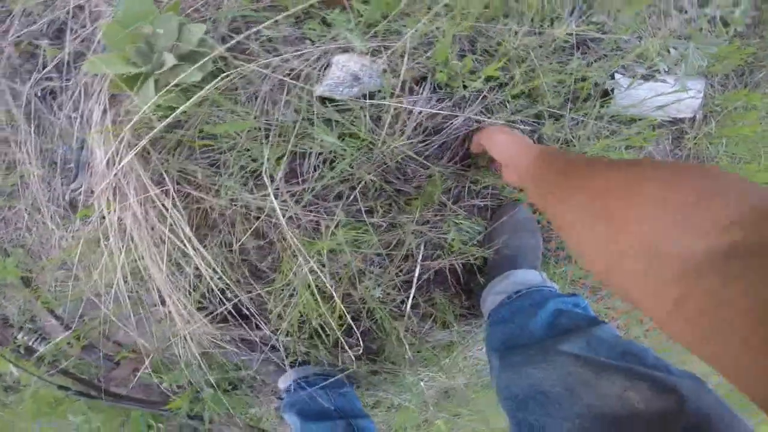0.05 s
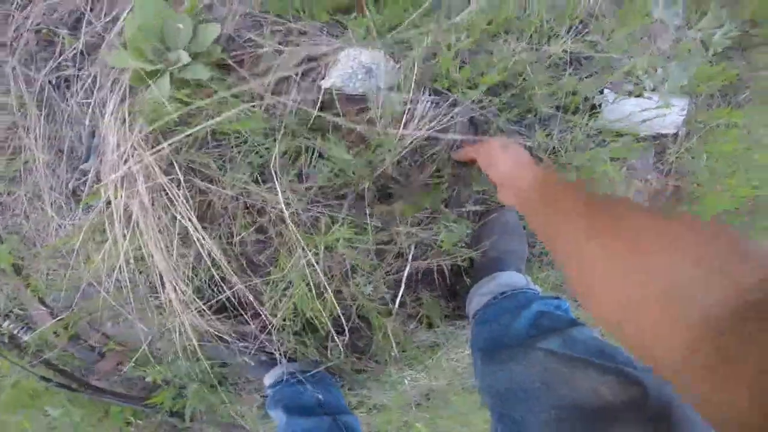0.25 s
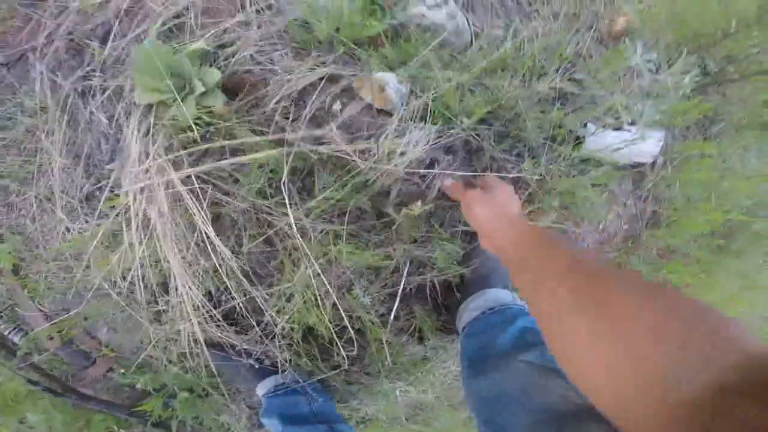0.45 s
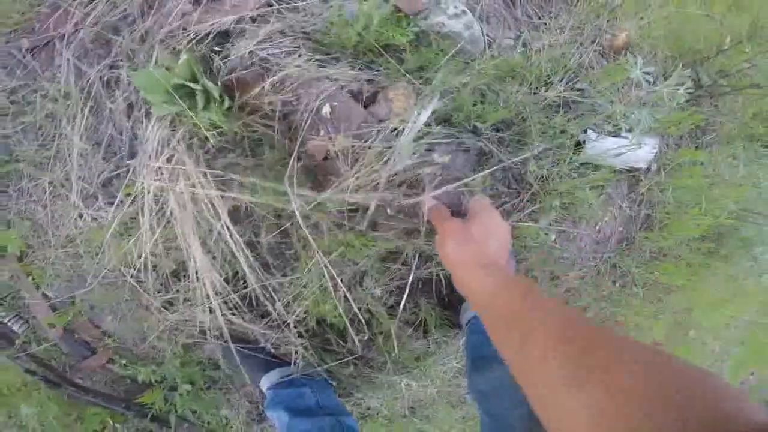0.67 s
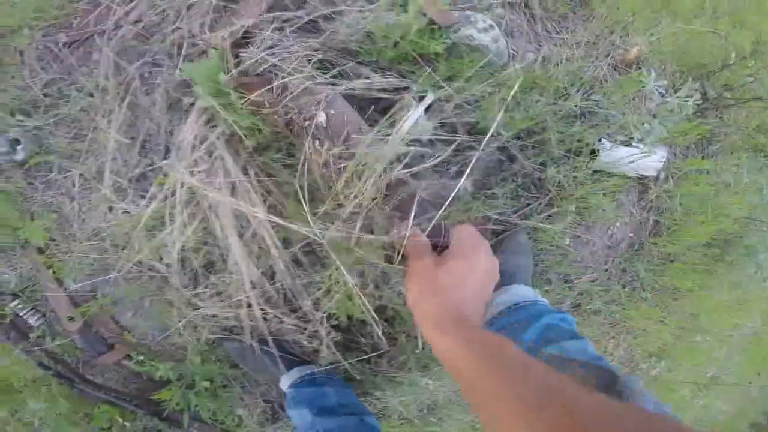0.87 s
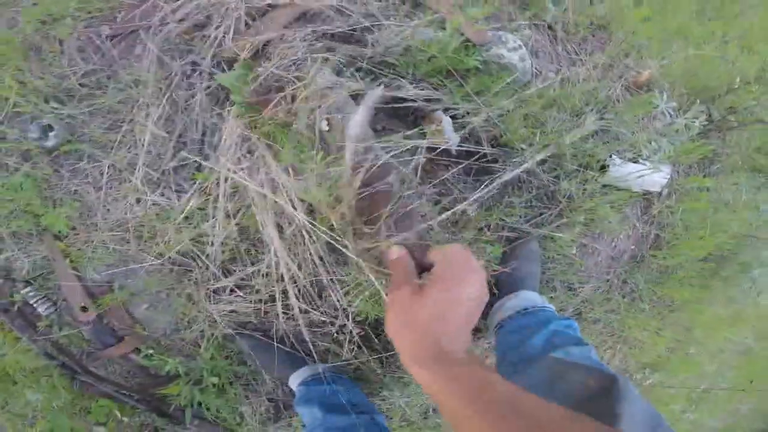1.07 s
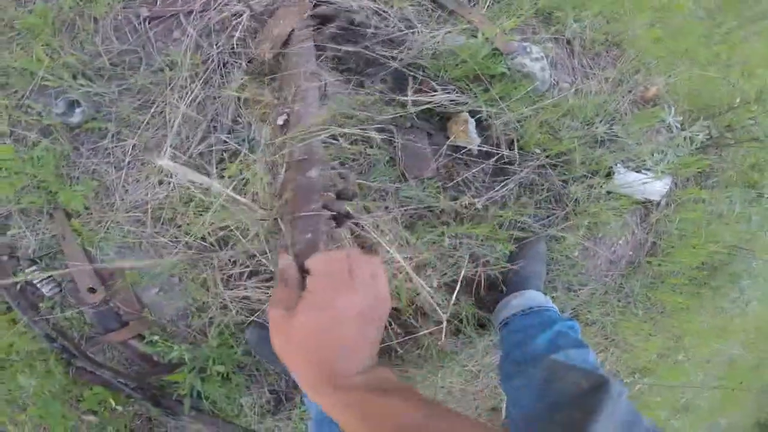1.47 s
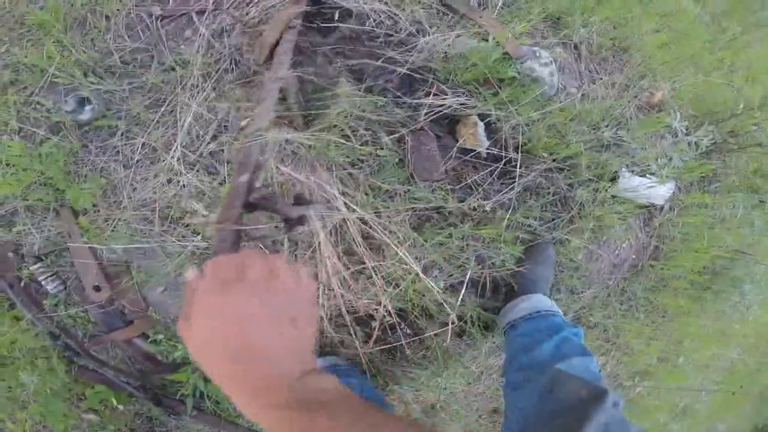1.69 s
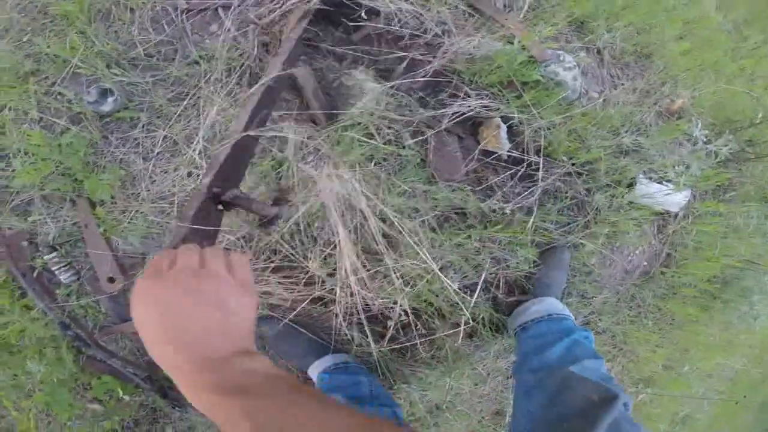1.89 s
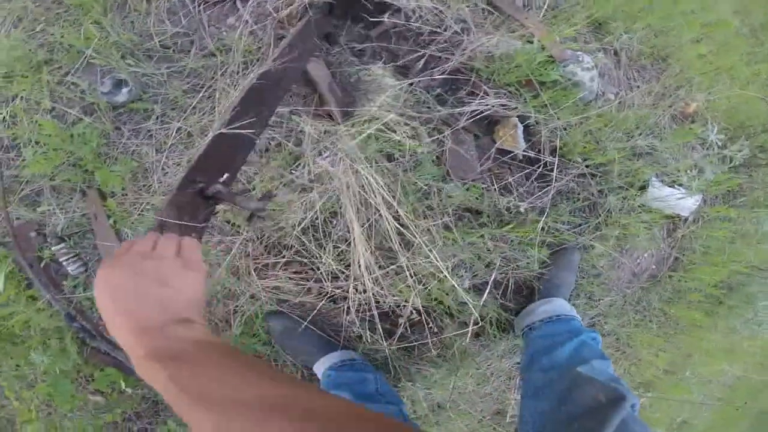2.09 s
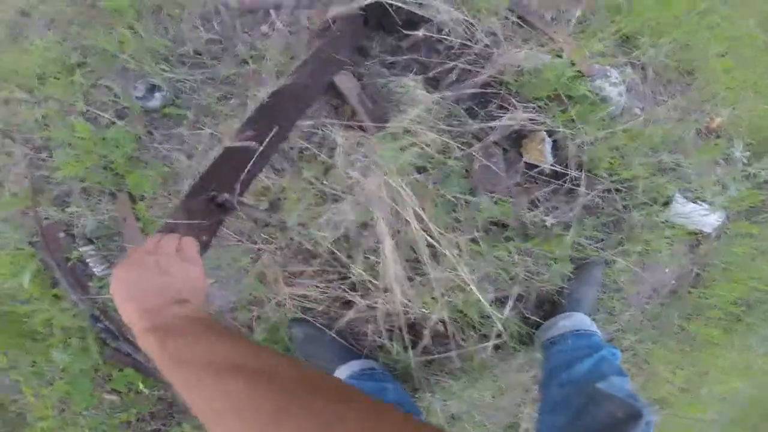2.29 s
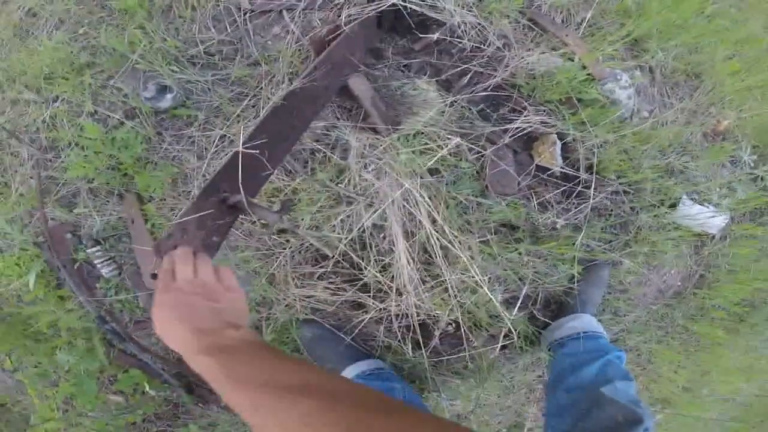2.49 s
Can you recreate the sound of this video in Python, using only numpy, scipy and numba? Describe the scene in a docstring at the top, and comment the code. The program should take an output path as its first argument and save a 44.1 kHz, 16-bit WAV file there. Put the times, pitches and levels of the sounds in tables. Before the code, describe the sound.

Steel bar dragged over soil and stones as dry stalks rustle and snap.

```python
"""A rusty steel bar is pulled out of dry grass and dragged over the ground, close by, outdoors.
Stalks rustle and snap as it starts to move, then it grinds through soil, knocks on stones and clinks.
Just after one second its edge judders and rasps over a stone. The grinding dies away, leaving
thinner rustle and snaps, until a last short scrape and two knocks at about 2.3 s.
Nearly all of the sound is in the right channel, over faint air and rumble."""
import sys
import numpy as np
from scipy import signal
from scipy.fft import rfft, irfft, next_fast_len
from scipy.io import wavfile
from numba import njit

SR = 44100
rng = np.random.default_rng(int(sys.argv[2]) if len(sys.argv) > 2 else 0)


def file_out(sig):
    """Save sig as 16-bit WAV at sys.argv[1]."""
    # one column per channel
    cols = np.atleast_2d(sig).T
    # limit, then scale
    lim = np.clip(cols, -1, 1)
    pcm = np.round(lim * 32767).astype(np.int16)
    wavfile.write(sys.argv[1], SR, pcm)


N = 116865
TIME = np.arange(N) / SR
CRUSH_S, CRACK_DB = 0.001, 8   # attack of a contact; its opening spike above the noise tail


def from_db(db):
    """Decibels to gain."""
    return 10 ** (np.asarray(db) / 20)


def rms_one(x):
    """Scale to an rms of one."""
    return x / np.sqrt(np.mean(x ** 2) + 1e-20)


def envelope(curve):
    """Gain over time from rows of time_s, level_db."""
    return from_db(np.interp(TIME, *np.transpose(curve)))


def add(out, start_s, sound):
    """Mix a short sound in at a time."""
    start = int(np.clip(start_s * SR, 0, N - 1))
    out[start:start + len(sound)] += sound[:N - start]


def drift(per_s, size=N):
    """Random modulation that glides to a new value so many times a second."""
    return np.interp(TIME[:size] * per_s, np.arange(1000), rng.standard_normal(1000))


def grains(per_s, spread_db):
    """Random clicks; the further spread_db is from zero, the more their sizes vary."""
    sizes = from_db(spread_db * np.minimum(rng.exponential(1, N), 4.5)) * rng.choice([-1, 1], N)
    return sizes * (rng.random(N) < per_s / SR)


def colour(x, spectrum):
    """Minimum-phase EQ from rows of frequency_hz, gain_db; the result has an rms of one."""
    size = 2 * next_fast_len(N)
    hz, db = np.transpose(spectrum)
    bin_hz = np.arange(size // 2 + 1) * SR / size
    log_gain = np.log(from_db(np.interp(np.log(bin_hz + 1), np.log(hz), db)))
    cepstrum = irfft(log_gain)
    response = np.exp(2 * rfft(cepstrum[:size // 2], size))
    return rms_one(irfft(rfft(x, size) * response)[:N])


def resonance(x, hz, width_hz):
    """Resonant band-pass with unity gain at its peak."""
    radius = np.exp(-np.pi * width_hz / SR)
    feedback = [1, -2 * radius * np.cos(2 * np.pi * hz / SR), radius ** 2]
    return signal.lfilter(np.array([1, 0, -1]) * (1 - radius ** 2) / 2, feedback, x)


@njit
def gliding_resonance(x, hz, width_hz):
    """Resonant band-pass with a moving centre."""
    radius = np.exp(-np.pi * width_hz / SR)
    feedback = 2 * radius * np.cos(2 * np.pi * hz / SR)
    y = np.zeros(len(x))
    for i in range(2, len(x)):
        y[i] = x[i] - x[i - 2] + feedback[i] * y[i - 1] - radius ** 2 * y[i - 2]
    return y


# how hard the bar grinds on the soil: time_s, level_db
GRIND_ENVELOPE = [(0.1, -65.5), (0.18, -38), (0.23, -38.5), (0.26, -29), (0.42, -21), (0.478, -37.5),
                  (0.51, -28.5), (0.62, -29), (0.69, -35.5), (0.77, -29), (0.82, -33.5), (0.98, -36),
                  (1.05, -46.5), (1.14, -34), (1.29, -35.5), (1.36, -53.5), (1.65, -66), (2.22, -61.5),
                  (2.29, -43), (2.41, -54.5), (2.55, -68)]
# tone of the crushed grit: frequency_hz, gain_db
GRIT_EQ = [(150, -20), (260, -7.5), (400, -2), (560, 2), (850, 0.5), (1150, -2), (1600, -7.5),
           (2500, -11.5), (6000, -37.5)]
# glide of the hollow scrape: time_s, pitch_hz
HOLLOW_GLIDE = [(.25, 710), (.33, 630), (.40, 517), (.445, 360), (.51, 667), (.63, 688), (.77, 482),
                (1.0, 564), (1.1, 308), (1.3, 290), (1.5, 830)]
SOIL_GRAINS_PER_S, SOIL_SPREAD_DB, JUDDER_DB = 2900, 3.5, 4
GRIT_DB, HOLLOW_DB = 0.5, -4


def soil():
    """Grit is crushed under the juddering bar, with a hollow resonance that glides as the bar moves."""
    judder = from_db(JUDDER_DB * drift(per_s=90))
    grit = colour(judder * grains(SOIL_GRAINS_PER_S, SOIL_SPREAD_DB), GRIT_EQ)
    hollow = judder * grains(SOIL_GRAINS_PER_S, SOIL_SPREAD_DB)
    pitch_hz = np.interp(TIME, *np.transpose(HOLLOW_GLIDE))
    for _ in range(2):   # two passes for steeper slopes
        hollow = gliding_resonance(hollow, pitch_hz, width_hz=140)
    return envelope(GRIND_ENVELOPE) * (from_db(GRIT_DB) * grit + from_db(HOLLOW_DB) * rms_one(hollow))


# hits of stones and thick stems on the bar: start_s, thud_db, knock_db, crack_db, tick_db
KNOCK_HITS = [(0.2601, -29.5, -31, -27, -40), (0.3157, -37, -23, -27.5, -35),
              (0.4454, -17, -22, -31, -47.0), (0.4982, -34, -26, -24.5, -41),
              (0.5292, -28, -21.5, -39, -45.0), (0.558, -23.5, -19, -25, -53),
              (0.7133, -26.5, -25, -40, -41), (0.7363, -23, -25.5, -26, -19.5),
              (0.7416, -26.5, -22.5, -27, -29), (0.8479, -31.5, -33, -26.5, -32),
              (0.8845, -32.5, -25.5, -34, -53), (0.9546, -41, -24, -25.5, -55),
              (1.0623, -43, -25, -19, -31.5), (1.274, -34, -25.5, -25, -34.5), (1.2983, -30, -28, -37, -62),
              (1.4022, -41.5, -31, -34, -58), (1.4521, -39.5, -30.5, -29, -54),
              (1.4844, -67, -34, -27.5, -41), (1.5136, -68, -60, -36, -34.5),
              (1.5769, -44.5, -32.5, -35.5, -38), (1.7576, -55, -34, -26.5, -33.5),
              (2.3247, -45, -28, -27.5, -27), (2.3639, -41.5, -29.5, -30, -38)]
# the thud, knock, crack and tick bands: low_hz, high_hz
KNOCK_BANDS_HZ = [(230, 900), (900, 2500), (2500, 7000), (7000, 15000)]
# trim of each band: gain_db
BAND_TRIMS_DB = [0, 0, 0, -1]
# decay of each band: t60_s
BAND_DECAYS_S = [0.015, 0.039, 0.03, 0.022]


def knocks():
    """Each contact crushes briefly, cracks and dies in a grainy burst whose mids last longest."""
    out, t = np.zeros(N), TIME[:SR // 12]
    bands = [signal.butter(3, edges, "band", fs=SR, output="sos") for edges in KNOCK_BANDS_HZ]
    energy = 0.0079 * SR   # as much as 7.9 ms at an rms of one
    for start_s, *band_db in KNOCK_HITS:
        roughness = from_db(1.5 * drift(per_s=694, size=len(t)))
        burst = rng.standard_normal(len(t)) * roughness * np.minimum(t / CRUSH_S, 1)
        burst[int(CRUSH_S * SR)] = from_db(CRACK_DB)
        for band, level_db, trim_db, t60_s in zip(bands, band_db, BAND_TRIMS_DB, BAND_DECAYS_S):
            part = signal.sosfilt(band, burst * from_db(-60 * t / t60_s))
            part *= np.sqrt(energy / np.sum(part ** 2))
            add(out, start_s, from_db(level_db + trim_db) * part)
    return out


# modes of the freely ringing bar: pitch_hz
MODE_PITCHES_HZ = [826, 1100, 1570, 2326, 2665, 3540, 3966, 4829, 5604, 6068, 6523, 7452, 9900, 11400]
# ring of each mode: level_db, t60_s
MODE_RINGS = [(0, 0.054), (4.5, 0.027), (-1, 0.019), (-7, 0.21), (-13.5, 0.12), (-10, 0.094), (-9, 0.12),
              (-16, 0.25), (-3.5, 0.085), (-16, 0.21), (-14.5, 0.22), (-14, 0.38), (5, 0.029), (5, 0.04)]
# hard contacts on the steel: start_s, level_db, favoured_hz, rolloff_hz
CLINK_HITS = [(0.5294, -27.5, 1570, 1900), (0.5612, -27.5, 1570, 1900), (.849, -30.5, 6100, 14000),
              (0.885, -19, 3700, 5600), (0.956, -35.5, 2700, 7760), (1.108, -38.5, 7450, 8900),
              (1.145, -38, 7450, 8600), (1.199, -38, 3600, 7900), (1.7579, -44, 2750, 4500)]
FAVOUR_DB, FAVOUR_OCTAVES = 19, 0.13


def clinks():
    """The bar rings: the place of contact favours modes near one pitch, its hardness sets the top end."""
    out, t = np.zeros(N), TIME[:SR // 3]
    for start_s, level_db, favoured_hz, rolloff_hz in CLINK_HITS:
        for hz, (mode_db, t60_s) in zip(MODE_PITCHES_HZ, MODE_RINGS):
            favour = np.exp(-(np.log2(hz / favoured_hz) / FAVOUR_OCTAVES) ** 2)
            rolloff = 1 / np.sqrt(1 + (hz / rolloff_hz) ** 10)
            ring = np.sin(2 * np.pi * hz * t) * from_db(-60 * t / t60_s) * rng.choice([-1, 1])
            add(out, start_s, rolloff * from_db(level_db + mode_db + FAVOUR_DB * favour) * ring)
    return out


# strokes of the edge over a stone: start_s, length_s, grit_db, ring_db, pitch_hz
RASP_STROKES = [(1.114, 0.12, -32.5, -43, 7500), (2.247, 0.078, -32, -32.5, 1080)]
# band of the rasp's grit: low_hz, high_hz
RASP_BAND_HZ = [920, 5900]


def rasps():
    """Quick tiny slips of the edge make a broken, gritty scrape and set one resonance singing."""
    out = np.zeros(N)
    band = signal.butter(3, RASP_BAND_HZ, "band", fs=SR, output="sos")
    for start_s, length_s, grit_db, ring_db, pitch_hz in RASP_STROKES:
        progress = np.clip((TIME - start_s) / length_s, 0, 1)
        swell = np.sqrt(np.maximum(np.sin(np.pi * progress), 0))
        catches = grains(per_s=1200, spread_db=-0.5) * from_db(JUDDER_DB * drift(per_s=90))
        grit = bar_body(signal.sosfilt(band, catches))
        ring = resonance(catches, pitch_hz, width_hz=130)
        out += swell * (from_db(grit_db) * rms_one(grit) + from_db(ring_db) * rms_one(ring))
    return out


# a quick stick-slip judder of the edge: start_s, level_db
SLIP_CLICKS = [(1.1051, -10), (1.1097, -7), (1.1165, -10.5), (1.1315, -9.5), (1.1462, -6), (1.161, -8.5),
               (1.1795, -12), (1.1995, -14), (1.2111, -9)]
# band of the clicks: low_hz, high_hz
CLICK_BAND_HZ = [1500, 7500]
SLIP_T60_S, SLIP_TAIL_DB = 0.011, -3.5


def slips():
    """Each slip of the edge is a hard click with a very short gritty tail."""
    out, t = np.zeros(N), TIME[:SR // 20]
    for start_s, level_db in SLIP_CLICKS:
        click = from_db(SLIP_TAIL_DB - 60 * t / SLIP_T60_S) * rng.standard_normal(len(t))
        click[0] = from_db(CRACK_DB)
        add(out, start_s, from_db(level_db) * click)
    return signal.sosfilt(signal.butter(2, CLICK_BAND_HZ, "band", fs=SR, output="sos"), out)


# resonances of the bar, damped by hand and grass: centre_hz
BODY_CENTRES_HZ = [532, 683, 808, 1570, 1800, 2092, 2980, 3610, 4170, 4790, 5750]
# boost at each resonance: gain_db
BODY_BOOSTS_DB = [1.63, 2.3, 3.8, 6, 2.9, 3.3, 4.9, 6.3, 6.8, 5.8, 1.55]
BODY_Q = 22.3


def bar_body(x):
    """The bar's damped resonances colour whatever touches it."""
    for hz, boost_db in zip(BODY_CENTRES_HZ, BODY_BOOSTS_DB):
        x = x + (from_db(boost_db) - 1) * resonance(x, hz, hz / BODY_Q)
    return x


# how hard the stalks are swept along: time_s, level_db
SWEEP_ENVELOPE = [(0.1, -60), (0.17, -39), (0.27, -32), (0.4, -30), (0.475, -33), (0.55, -25), (0.69, -33),
                  (0.82, -32), (0.93, -37.5), (1.02, -33), (1.052, -46), (1.094, -36), (1.11, -25),
                  (1.19, -32), (1.32, -33.5), (1.38, -37), (1.47, -35), (1.54, -42), (1.65, -44),
                  (1.78, -44.5), (1.82, -38.5), (2.1, -47.5), (2.16, -41.5), (2.24, -41.5), (2.3, -37),
                  (2.41, -43.5), (2.465, -41), (2.52, -55.5)]
# tone of the dry stalks: frequency_hz, gain_db
STALK_EQ = [(400, -8.5), (1000, -2), (1800, -0.4), (4500, -2.5), (6300, -4.5), (8000, -11), (10500, -13.5),
            (16000, -27)]
# bright hiss of the leaves: frequency_hz, gain_db
LEAF_EQ = [(1500, -11), (4000, -8), (10500, 1), (16000, -11.5)]
FIBRE_HZ, FIBRE_Q = np.geomspace(1500, 7000, 10), 2.5
RUB_DB, CRACKLE_DB, CRACKLES_PER_S = -2, -5.5, 220
LEAF_DB, LEAF_FADE_DB_PER_S = -18, 0.5   # fewer leaves cling to the bar as it comes free


def stalks():
    """Dry blades rub in clumps of fine grains and single fibres crackle, over a smooth hiss of leaves."""
    clumps = from_db(2.5 * drift(per_s=110))
    rubbing = clumps * grains(per_s=7000, spread_db=0.5)
    per_fibre = CRACKLES_PER_S / len(FIBRE_HZ)
    breaks = sum(resonance(grains(per_fibre, spread_db=4.5), hz, hz / FIBRE_Q) for hz in FIBRE_HZ)
    crackle = signal.fftconvolve(breaks, splinter(t60_s=0.014))[:N]
    rustle = from_db(RUB_DB) * colour(rubbing, STALK_EQ) + from_db(CRACKLE_DB) * colour(crackle, STALK_EQ)
    hiss = from_db(LEAF_DB - LEAF_FADE_DB_PER_S * TIME) * colour(rng.standard_normal(N), LEAF_EQ)
    sweep = envelope(SWEEP_ENVELOPE)
    return sweep * rustle + sweep ** 0.76 * hiss   # the hiss swings less than the rustle


def splinter(t60_s):
    """A fibre breaks: one crack and a short, dying tear."""
    t = TIME[:SR // 20]
    tear = rng.standard_normal(len(t)) * from_db(-60 * t / t60_s)
    tear[0] = from_db(CRACK_DB)
    return tear


# thin dry stalks snapping: start_s, level_db
STALK_SNAPS = [(0.2007, -16), (0.2476, -13), (0.329, -7.5), (0.3754, -5), (0.382, -5.5), (0.584, -16),
               (1.2449, -4), (1.3536, -15), (1.4649, -7.5), (1.673, -20), (1.7244, -15), (1.7969, -19.5),
               (1.9196, -17.5), (1.9767, -17), (2.0169, -19), (2.0399, -17.5), (2.074, -21.5),
               (2.1266, -21.5), (2.15, -15.5), (2.2593, -9.5), (2.3418, -10.5), (2.4517, -22)]
SNAP_HZ, SNAP_SPREAD_OCTAVES, SNAP_RING_DB, SNAP_TRIM_DB = 4050, 0.41, 4.5, -15.5


def snaps():
    """Single stalks break, each with a pitch of its own and the colour of the rustle."""
    out = np.zeros(N)
    for start_s, level_db in STALK_SNAPS:
        tear = splinter(t60_s=0.031)
        pitch_hz = SNAP_HZ * 2 ** (SNAP_SPREAD_OCTAVES * rng.standard_normal())
        ring = from_db(SNAP_RING_DB) * resonance(tear, pitch_hz, pitch_hz / FIBRE_Q)
        add(out, start_s + CRUSH_S, from_db(level_db + SNAP_TRIM_DB) * (tear + ring))
    return np.std(out) * colour(out, STALK_EQ)


# soft thumps on the ground: start_s, level_db
GROUND_BUMPS = [(0.553, -43), (0.741, -40), (1.199, -37)]
# their rise time, and their dull tone: frequency_hz, gain_db
BUMP_RISE_S, BUMP_EQ = 0.0088, [(25, -13), (70, -10), (150, 1.5), (900, -21)]


def bumps():
    """Soft, dull low thumps on the ground, like footfalls, each a short swell."""
    swells = np.zeros(N)
    for start_s, level_db in GROUND_BUMPS:
        age = np.maximum(TIME - start_s, 0) / BUMP_RISE_S
        swells += from_db(level_db) * age * np.exp(1 - age)
    return swells * colour(rng.standard_normal(N), BUMP_EQ)


# bed of outdoor air: frequency_hz, gain_db
AIR_EQ = [(25, -7), (59, -5), (531, -15), (3820, -24), (4740, -10), (7110, -38), (16000, -54)]
# low rumble of movement: frequency_hz, gain_db
RUMBLE_EQ = [(25, -0.5), (240, 1), (500, -9), (1500, -40.5)]
AIR_DB, RUMBLE_DB = -60, -57.5


def background():
    """Faint outdoor air and a low uneven rumble of movement."""
    air = colour(rng.standard_normal(N), AIR_EQ)
    rumble = colour(rng.standard_normal(N) * from_db(3.2 * drift(per_s=21)), RUMBLE_EQ)
    return from_db(AIR_DB) * air + from_db(RUMBLE_DB) * rumble


# noise floor on the left: frequency_hz, gain_db
LEFT_HISS_EQ = [(25, -5), (300, -16), (1000, -22.5), (16000, -32)]
BLEED_DB, SCATTER_DB, SCATTER_T60_S, LEFT_HISS_DB = -38, -54, 0.023, -66.5


def left_bleed(right):
    """The left channel carries only a trace of the right, direct and scattered, over faint hiss."""
    t = TIME[:SR // 20]
    scatter = rng.standard_normal(len(t)) * from_db(-60 * t / SCATTER_T60_S)
    scattered = signal.fftconvolve(right, scatter / np.linalg.norm(scatter))[:N]
    direct = np.roll(right, 2)   # two samples late
    hiss = colour(rng.standard_normal(N), LEFT_HISS_EQ)
    return from_db(BLEED_DB) * direct + from_db(SCATTER_DB) * scattered + from_db(LEFT_HISS_DB) * hiss


def scene():
    """Contacts coloured by the bar join its ringing, the bumps and the air, panned almost hard right."""
    contacts = bar_body(soil() + stalks() + snaps() + slips() + knocks())
    right = from_db(-3) * contacts + clinks() + rasps() + bumps() + background()
    return from_db(6.5) * np.array([left_bleed(right), right])


def record(dry):
    """Any peak over full scale clips, and a steep low-pass cuts the top."""
    low_pass = signal.cheby2(16, 70, 16400, fs=SR, output="sos")
    return signal.sosfilt(low_pass, np.clip(dry, -1, 1))


dry = scene()
out = record(dry)
file_out(out)
```